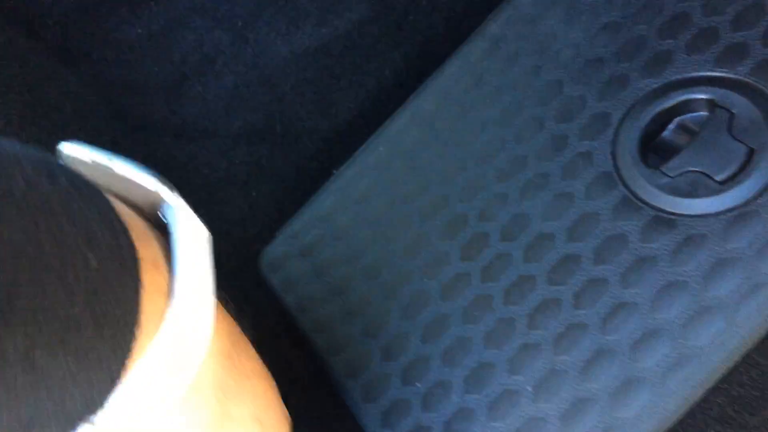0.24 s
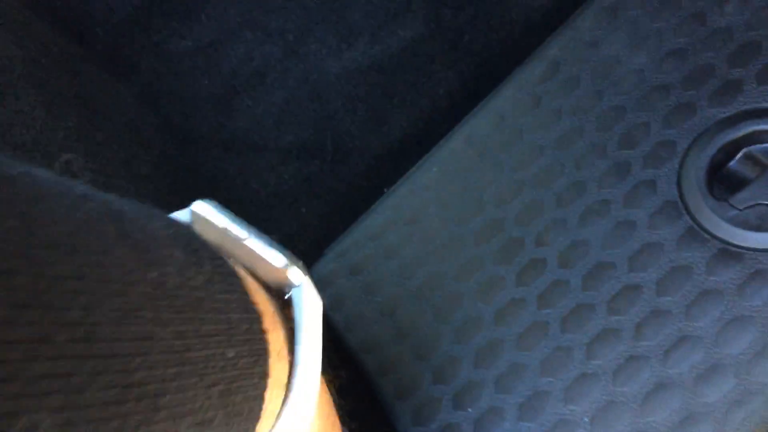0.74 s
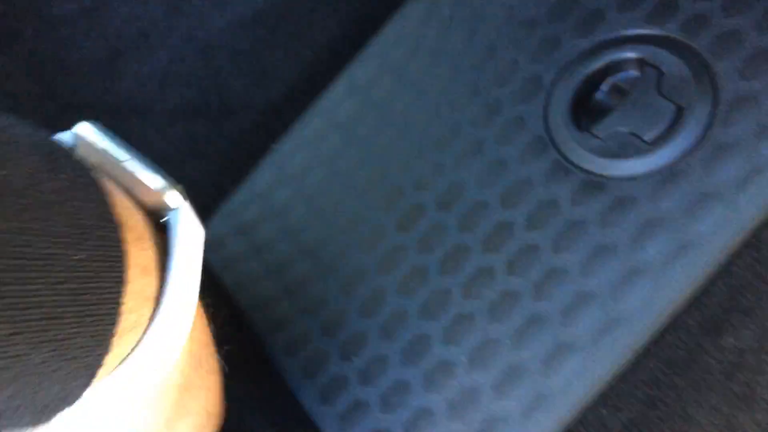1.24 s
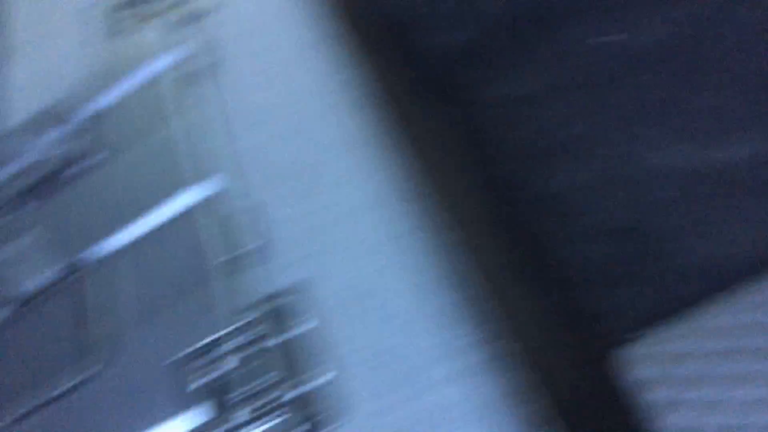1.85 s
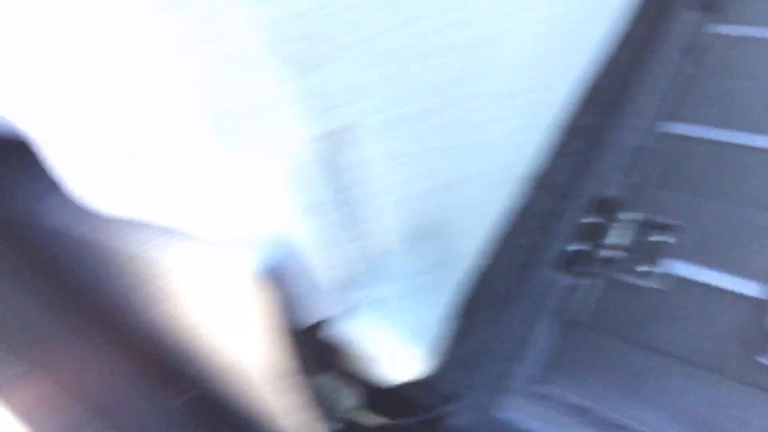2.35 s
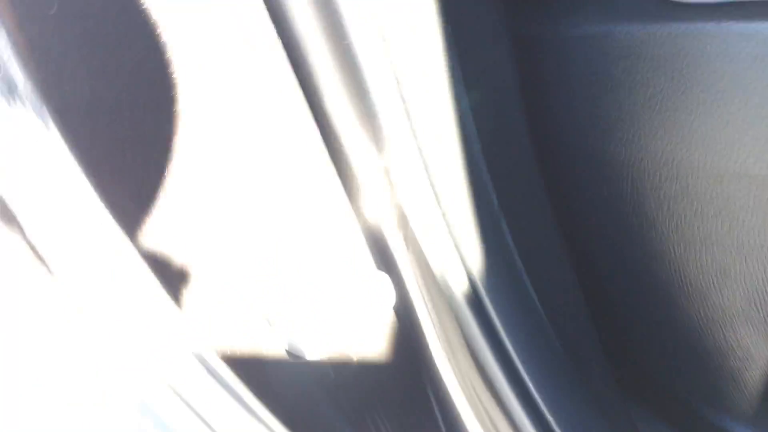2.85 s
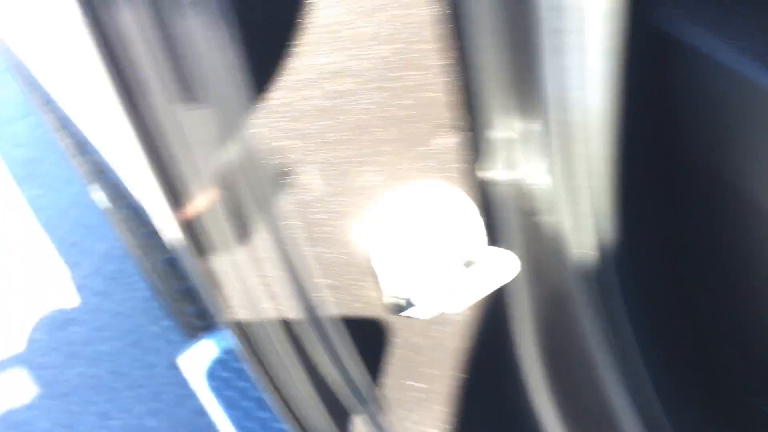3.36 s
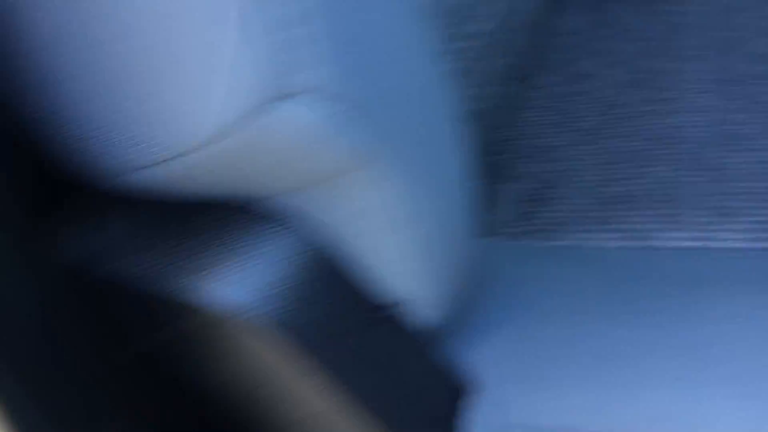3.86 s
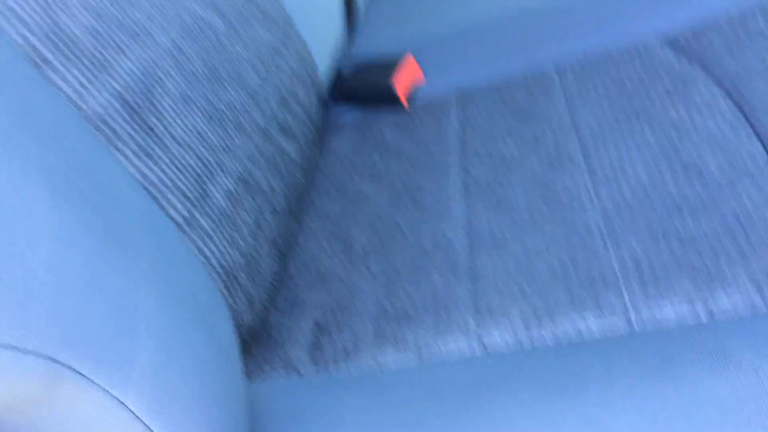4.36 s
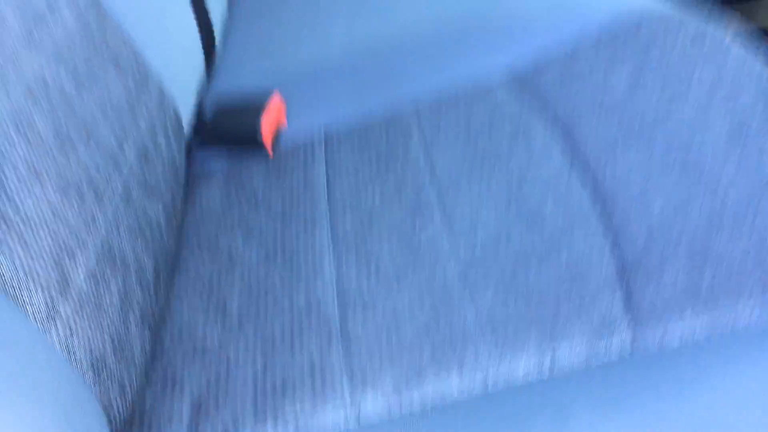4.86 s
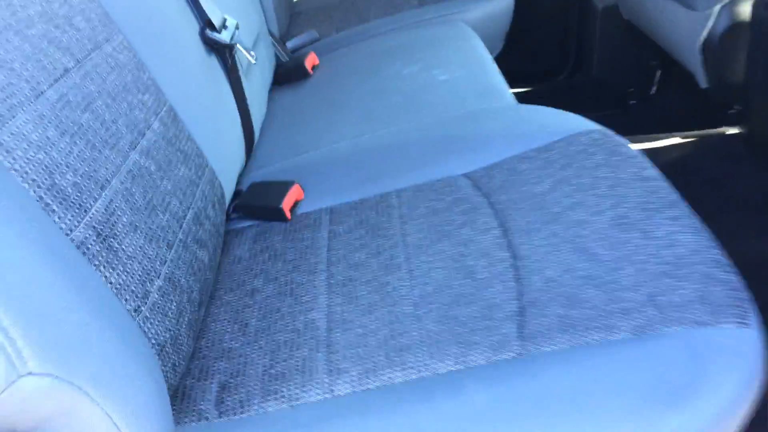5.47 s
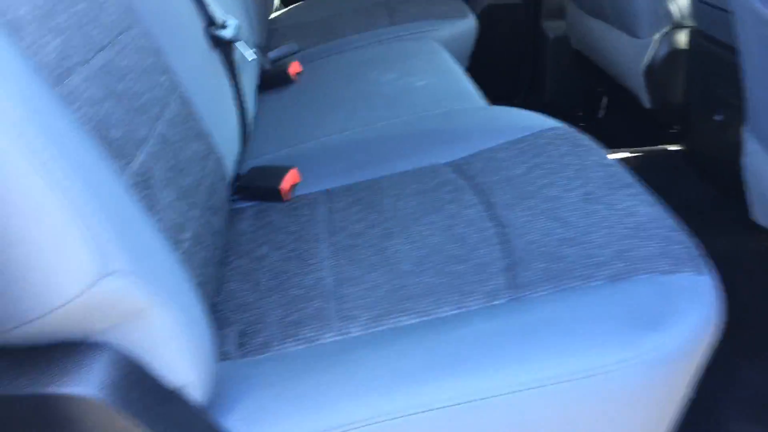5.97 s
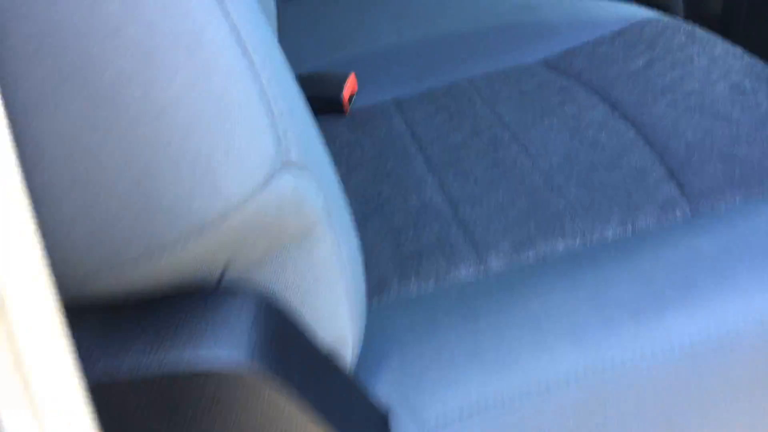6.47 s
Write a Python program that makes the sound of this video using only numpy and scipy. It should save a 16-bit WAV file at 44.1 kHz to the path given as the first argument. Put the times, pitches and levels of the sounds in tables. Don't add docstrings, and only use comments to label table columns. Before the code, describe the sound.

Close to a hand-held phone in a truck cabin with doors open, plastic lids tap and scuff, then one snaps loudly. A small knob clicks. A seat latch cracks and the cushion bangs; an engine pulls away outside through a gear change. Fabric rushes, and a deeper, heavier slam overloads the microphone. Afterwards come soft knocks, scraping and buckle clicks over low road rumble.

```python
import sys
import numpy as np
from scipy import signal
from scipy.fft import rfft, irfft
from scipy.io import wavfile
from scipy.ndimage import uniform_filter1d

SR = 44100
rng = np.random.default_rng(int(sys.argv[2]) if len(sys.argv) > 2 else 0)


def gain_from_db(level_db):
    decades = np.asarray(level_db, float) / 20
    return 10 ** decades


def generate_wav(sig):
    pcm = np.round(np.clip(np.atleast_2d(sig).T, -1, 1) * 32767).astype(np.int16)
    wavfile.write(sys.argv[1], SR, pcm)


N = 296925

# (frequency [Hz], density [dB/Hz])
RUMBLE_SPECTRUM = [(12, -50.5), (20, -24.5), (34, -10), (49, -2.5), (124, 0), (136, -4), (172, -12.5),
                   (247, -5.5), (322, -16), (354, -19.5), (480, -31), (620, -60.5), (1060, -120)]
TYRE_SPECTRUM = [(210, -37.5), (400, -10.5), (510, -14), (620, -6.5), (729, -8), (912, -3.5), (990, -3.5),
                 (1250, -1.5), (2170, -20.5), (2830, -31.5), (3160, -33), (4000, -36.5), (5200, -61),
                 (8800, -120)]
CLOTH_SPECTRUM = [(1500, -23.5), (2240, -7), (2850, -4), (3400, -3.5), (4880, -8.5), (5820, -6),
                  (7450, -11.5), (9500, -12.5), (12000, -16.5), (15700, -17.5), (16500, -45)]
MIC_HISS_SPECTRUM = [(1470, -30.5), (2500, 0.5), (4890, -9.5), (8640, -13.5), (10400, -18), (12000, -13),
                     (15100, -18), (16100, -24), (16500, -41)]

# (time [s], engines [dB], tyres [dB])
TRAFFIC = [(0, -37, -52), (.5, -41, -55), (1.0, -43, -54.5), (1.3, -39, -56), (1.74, -46, -58),
           (2.17, -45, -52.5), (2.47, -37.5, -50.5), (3.1, -36.5, -51.5), (3.42, -34, -47),
           (3.7, -31.5, -47.5), (3.88, -39, -59.5), (4.2, -36.5, -52.5), (4.42, -40, -55.5),
           (5.05, -41, -55), (5.55, -36.5, -49), (5.87, -38.5, -47.5), (6.201, -38, -47.5),
           (6.73, -34.5, -48)]
# (time [s], door shade, dull minus bright [dB], near detour [ms], detour share [ratio])
POSE = [(0, -2.5, 2.8, 0.21), (1.0, 0.5, 3, 0.21), (1.4, 1.5, 2.8, 0.39), (1.9, 0.5, 2.56, 0.18),
        (2.2, -9.5, 2, 0.2), (2.7, -7.5, 1.8, .22), (3.1, -11, 2, 0.57), (3.6, -6.5, 2.06, 0.55),
        (4.0, -10, 1.91, 0.3), (4.8, -9.5, 1.5, .2), (5.3, -4, 2.92, 0.22), (5.9, -6.5, 2.8, 0.27),
        (6.73, -8.5, 1.56, .22)]
# (time [s], level [dB], decay T60 [s], build-up [s])
GUSTS = [
    (2.8, -17.5, .5, .04),
    (3.745, -10.5, 0.34, .03),
]
# (start [s], loudest [s], end [s], level [dB])
BRUSHES = [(-.1, 0, 0.34, -71.5), (.55, 1.0, 1.1, -76.5), (2.063, 2.172, 2.24, -62),
           (2.504, 2.72, 3.2, -89.5), (3.24, 3.46, 3.68, -59.5), (3.502, 3.725, 3.86, -66),
           (3.97, 4.04, 4.17, -70.5), (4.1, 4.24, 4.33, -61), (6.297, 6.728, 7.1, -76)]
CLOTH_REST_DB = -74.5

# (time [s], firing rate [Hz], level [dB])
LOW_GEAR = [(2.15, 140.6, -74), (2.234, 145.1, -47), (2.454, 156.2, -50), (2.572, 168, -36.5),
            (2.678, 176, -43.5), (2.72, 178.9, -65.5)]
HIGH_GEAR = [(2.72, 103, -33.5), (2.882, 112.4, -32), (2.989, 119, -34.5), (3.178, 128.5, -28),
             (3.346, 134.5, -32), (3.398, 128.3, -31.5), (3.606, 104.5, -52), (3.7, 103, -55)]

# (frequency [Hz], peak [dB], decay T60 [s])
SMALL_LID = [(125, -12.5, 0.075), (191, -22, 0.12), (226, -2, 0.028), (8700, -27.5, .027)]
BIG_LID = [(147, -15.5, 0.11), (250, -6, 0.05), (377, -9.5, .055), (566, -15, 0.1), (665, -9.5, 0.035),
           (900, -11, 0.03), (1200, -7, 0.025), (1430, -10.5, 0.03), (1832, -16, .03), (2290, -17, .03),
           (2560, -13, .025), (2920, -21, 0.05), (3300, -19, 0.035), (4000, -20, .02)]
LID_RIM = [(4800, -19, .016), (5300, -23, .014), (7000, -21, .014), (7900, -21, .014), (9900, -22, .014)]
KNOB_OUT = [(1775, -37.5, 0.058), (3040, -25, 0.026), (3950, -34, 0.025), (6300, -41.5, .04)]
KNOB_IN = [(2370, -28, 0.018), (4020, -32, 0.018), (6200, -36, .015)]
CATCH_OPEN = [(1000, -25.5, .04), (1450, -29.5, 0.088), (1700, -27, .025), (2300, -18, .015),
              (2900, -12, .016), (3600, -18, .015), (4450, -13.5, 0.016), (5300, -22, .015),
              (6700, -21, 0.017)]
CATCH_SHUT = [(1446, -33.5, 0.18), (4510, -27.5, 0.019), (9360, -32.5, 0.017), (9820, -36.5, 0.016),
              (11170, -43, .012), (14360, -35, .014), (15100, -39, .012)]
SEAT_BACK = [(119, -10.5, 0.12), (152, -15.5, 0.086), (212, -12.5, 0.07), (270, -3, 0.054), (427, -19, .05),
             (524, -20, 0.077), (680, -14.5, .04), (854, -12.5, 0.049), (1186, -18, .03),
             (1400, -11.5, 0.051), (1680, -19, .04)]
SEAT_BASE = [(128.3, -6.5, 0.15), (160, -7, 0.2), (206, -5, .1), (290, 5.5, 0.05), (415, -2, 0.058),
             (563, -13.5, 0.12), (680, -11, 0.033), (877, -10, 0.04), (1700, -10, 0.025),
             (1950, -14.5, 0.04), (3200, -17, .03), (4360, -19, 0.03)]
BUCKLE = [(320, -31.5, 0.2), (2840, -48, 0.07), (3920, -44, 0.025), (5550, -47, .02)]
FOOTWELL = [(85, -7, 0.028), (145.6, -12, 0.044), (286, -20.5, 0.056)]
# (time [s], part struck, lag of each mode [cycles], contact [s])
BLOWS = [(.223, SMALL_LID, 0.7, .0006), (1.1248, BIG_LID, 0.1, .0001), (1.1248, LID_RIM, .4, .0002),
         (1.6192, KNOB_OUT, 2.17, 0.0022), (1.6514, KNOB_IN, 0.72, .0008),
         (2.8128, CATCH_OPEN, 0.41, 0.00027), (2.859, SEAT_BACK, 2.65, 0.00072),
         (3.7025, CATCH_SHUT, 1.3, 0.00097), (3.733, SEAT_BASE, 1.66, 0.00061),
         (5.595, BUCKLE, 1.05, 0.00079), (6.187, FOOTWELL, 1.04, .0001)]
# (time [s], peak [dB], frequency [Hz], decay T60 [s])
TAPS = [(.152, -21.5, 250, 0.021), (.259, -40, 5770, .023), (0.583, -34, 235, 0.027),
        (1.1246, -5, 760, .012), (1.163, -46, 2950, 0.039), (1.596, -23.5, 292, 0.024),
        (1.6535, -25, 1930, .025), (1.664, -36, 2200, .02), (1.669, -31, 1910, .025),
        (1.673, -35, 2250, .015), (1.637, -43, 6400, .03), (1.627, -36, 3300, .02), (1.601, -26, 280, .015),
        (1.907, -27.5, 404, 0.013), (2.1175, -15, 181, 0.014), (2.159, -15, 646, 0.0077),
        (2.827, -26, 1680, 0.04), (2.897, -32, 4500, 0.027), (2.906, -36, 4400, 0.027),
        (2.881, -19, 5500, 0.015), (2.8618, -5.5, 3680, .022), (2.8615, -13, 2900, .015),
        (2.861, -15, 4700, .014), (2.861, -18, 8050, .012), (2.861, -18, 6700, .012), (2.85, -12, 950, .02),
        (2.85, -19, 2600, .02), (2.882, -24, 8200, .014)]
LATE_TAPS = [(2.85, -11, 1400, 0.049), (2.952, -19, 59, 0.13), (3.846, -45.5, 3970, 0.02),
             (3.848, -23.5, 1490, 0.017), (3.972, -17.5, 61.1, 0.13), (4.322, -20, 116, 0.057),
             (4.653, -34.5, 157.4, .054), (5.158, -19, 375, 0.016), (5.163, -51.5, 2500, 0.049),
             (5.363, -28, 190, 0.058), (5.524, -49, 2920, .03), (5.5245, -22, 79, .1), (.005, -24, 112, .1),
             (.1, -24, 108, .12), (2.887, -3, 84, 0.14), (5.5245, -42, 3350, .05), (5.596, -37, 4000, .025),
             (5.6, -41, 2800, .04), (5.596, -38, 1250, .02), (5.524, -44, 6400, .02),
             (5.548, -48, 6500, .025), (5.576, -46, 5500, .015), (5.6, -30, 480, .04),
             (5.627, -23, 330, .01), (5.625, -28, 173, .085), (5.651, -31, 109, .047),
             (6.381, -16.5, 76.5, 0.074), (3.895, -66.5, 2770, 1.1), (3.9, -74, 2820, .9),
             (3.7587, 6.5, 73.5, .15), (3.746, -5, 80, .07), (3.8, -37, 620, .12), (3.79, -30, 450, .14),
             (3.77, -20, 285, .4), (3.768, -12, 208, .2), (3.76, -28, 786, .1), (3.799, -8.5, 120, .16),
             (3.85, -15, 78, 0.15), (3.752, -18, 900, .025), (2.394, -48.5, 6200, 0.014)]
BUILD_UP_CYCLES, TAP_CONTACT_S = 0.33, 0.00089
BUZZ, LOOSE_S, CLAMPED_BUZZ_RATIO = 0.065, 0.3, 0.4

# (start [s], length [s], level [dB], lowest [Hz], highest [Hz])
SCUFFS = [(0.045, 0.03, -57.5, 2000, 7600), (0.106, 0.17, -55.5, 1510, 5800),
          (0.176, .055, -56, 5000, 15500), (0.227, 0.05, -48, 2500, 15500),
          (0.413, 0.08, -62.5, 2500, 8700), (0.555, 0.077, -57, 2480, 12230),
          (0.919, 0.053, -58.5, 2860, 7550), (1.051, 0.17, -56, 1487, 8000),
          (1.442, 0.051, -51.5, 2980, 7500), (1.575, 0.11, -55, 1500, 13150),
          (2.103, 0.066, -43, 2900, 15500), (2.743, 0.065, -54, 1220, 4500),
          (2.77, 0.044, -46.5, 1504, 12030), (2.827, 0.051, -42.5, 1510, 11800),
          (2.858, .03, -32.5, 2000, 12070), (3.998, 0.072, -69, 3960, 14130), (4.2, 0.13, -65, 1790, 7000),
          (5.517, 0.16, -60, 1800, 7150)]
MORE_SCUFFS = [ (5.518, 0.065, -35, 280, 1200), (5.52, .02, -62, 8000, 15000), (5.59, .02, -62, 8000, 15000),
               (6.58, .14, -67, 9500, 12500), (5.525, .04, -50, 2300, 4000), (5.595, .045, -49, 2300, 4500),
               (1.135, .04, -44, 400, 1000), (1.59, .025, -52, 1800, 4300), (5.1, 0.12, -41, 310, 1200),
               (5.538, 0.16, -29.5, 420, 640), (1.619, 0.063, -53, 1600, 5900), (6.55, .18, -69, 5700, 14000),
               (6.64, 0.074, -62, 11000, 11600), (5.85, 0.45, -63, 2300, 5400), (2.72, .09, -58.5, 11000, 12000),
               (4.703, 0.41, -68, 11000, 11900), (4.19, .1, -61, 9900, 15500)]

# (time [s], treble peak [dB], knock minus treble [dB], decay [s])
LID_CRACKS = [(0.142, -47, 9.5, 0.039), (0.221, -23, -8, 0.025), (0.2233, -18.5, -13, 0.032),
              (0.232, -40, 6, 0.028), (0.2424, -36, -9, 0.016), (.259, -49, -12, .04),
              (.584, -50, 9.5, 0.079), (.6, -53, -3, .03), (1.1248, -4, -11, .012), (1.1265, -14, 0, 0.01),
              (1.1305, -27, -1, 0.03), (1.208, -46, -4, .061), (1.391, -55, 11.5, 0.018),
              (1.6215, -43, 3, 0.03), (1.639, -47, 6, .04), (1.652, -34, -4, 0.039),
              (1.6628, -38.5, -3, 0.018), (1.905, -58, 12.5, 0.018), (2.157, -47.5, 12.5, 0.036),
              (2.394, -47.5, 13.5, .015), (4.764, -57, 8.5, 0.014), (4.84, -60.5, -9, .015),
              (5.157, -57, 11, 0.032)]
SEAT_CRACKS = [(2.7845, -42, 8, 0.032), (2.795, -42, 11, 0.041), (2.8125, -8, -17.5, 0.014),
               (2.8136, -11, -15, .01), (2.821, -27, -8, .025), (2.827, -30.5, 4, .025),
               (2.844, -28, 4, 0.044), (2.8494, -14, 2.5, 0.025), (2.8545, -18, 5, .025),
               (2.861, -6.5, -7, 0.02), (2.8643, -11.5, 0, 0.03), (2.872, -19, 4, .03),
               (2.877, -20.5, 3, .02), (2.8815, -18, -8, 0.018), (2.8845, -19, -5, .012),
               (2.898, -31, 3, .017), (2.907, -39.5, 15, .013), (3.244, -52, -1, .03),
               (3.2856, -50, 3, .03), (3.345, -50, 2, .02), (3.39, -49, 8, .025), (3.688, -47, 4, .02),
               (3.702, -33, -.5, 0.041), (3.7335, -12.5, -1.5, 0.02), (3.7361, -8, -5, .025),
               (3.742, -13, -3, 0.02), (3.7475, -14.5, -4, .02), (3.752, -17, 2, 0.02),
               (3.764, -32, 12, .02), (3.775, -33, 12, 0.028), (3.784, -33.5, 1, .041), (3.8, -44, 3, .03),
               (3.8473, -41.5, 0, .015)]
BUCKLE_CRACKS = [(5.5244, -36.5, 1, .016), (5.5295, -39.5, 5, .02), (5.549, -45, 5, .016),
                 (5.5755, -39.5, 2, .014), (5.5945, -40, 2, .01), (5.5962, -30.5, -1, .018),
                 (5.603, -40, 1, .03), (5.622, -46, 6, .03), (5.651, -48, 4, .02)]
LID_TOP_HZ, LID_DULLING = 17000, 0.08
SEAT_TOP_HZ, SEAT_DULLING = 14000, 0.17
BUCKLE_TOP_HZ = 7200

# (start [s], length [s], level [dB], lowest [Hz], highest [Hz])
GLIDES = [(3.16, .56, -51.5, 2550, 3100), (3.26, .5, -62, 3400, 4300), (3.26, .34, -59.5, 5500, 7000),
          (3.5, .28, -57.5, 5200, 6400), (3.26, .4, -68.5, 8200, 17000), (3.5, .26, -65, 7400, 9000),
          (3.58, .2, -52, 1100, 4600), (3.232, 0.035, -63, 4800, 6000)]

CABIN_T60_S, CABIN_DB = 0.14, -18.5
DUCK_DB, RECOVER_S = -9, 0.23
MIC_TOP_HZ = 15800


def shaped(points):
    hz, db = np.transpose(points)
    log_hz = np.log(np.arange(1, N // 2 + 2) * SR / N)
    gain = gain_from_db(np.interp(log_hz, np.log(hz), db))
    x = irfft(rfft(rng.standard_normal(N)) * gain, N)
    return x / x.std()


def band(x, lo_hz, hi_hz):
    edges_hz = [lo_hz, min(hi_hz, 0.45 * SR)]
    return signal.sosfilt(signal.butter(2, edges_hz, "bandpass", fs=SR, output="sos"), x)


def walk(rate_hz):
    k = int(SR / rate_hz)
    held = np.repeat(rng.standard_normal(N // k + 1), k)
    return uniform_filter1d(uniform_filter1d(held, k), k)[:N]


def fade(t60_s, rise_s):
    t = np.arange(int(t60_s * SR)) / SR
    return t, (1 - np.exp(-t / rise_s)) * gain_from_db(-60 * t / t60_s)


def add(track, start_s, sound):
    i = int(start_s * SR)
    track[i:i + len(sound)] += sound[:N - i]


def bounced(x):
    pose_s, _, detour_ms, share = np.transpose(POSE)
    i = np.arange(N)
    near_ms = np.interp(i / SR, pose_s, detour_ms)
    far_ms = 4.0 + 0.8 * walk(3)
    near = np.interp(i - near_ms * SR / 1e3, i, x)
    far = np.interp(i - far_ms * SR / 1e3, i, x)
    return x + np.interp(i / SR, pose_s, share) * near + 0.3 * far


def rumble():
    time_s, engines_db, _ = np.transpose(TRAFFIC)
    level = gain_from_db(np.interp(np.arange(N) / SR, time_s, engines_db))
    for start_s, db, t60_s, rise_s in GUSTS:
        add(level, start_s, gain_from_db(db) * fade(t60_s, rise_s)[1])
    noise = shaped(RUMBLE_SPECTRUM)
    deep = band(noise, 30, 95)
    lumps = deep * gain_from_db(2.5 * walk(8)) + (noise - deep) * gain_from_db(2.5 * walk(16))
    return 0.92 * lumps * level


def tyres():
    t = np.arange(N) / SR
    time_s, _, tyres_db = np.transpose(TRAFFIC)
    hiss_db = np.interp(t, time_s, tyres_db)
    roar_db = hiss_db + np.interp(t, *np.transpose(POSE)[:2])
    noise = bounced(shaped(TYRE_SPECTRUM))
    roar = band(noise, 520, 1136) * gain_from_db(roar_db + 6.5 + 3.0 * walk(19))
    hiss = band(noise, 893, 7300) * gain_from_db(hiss_db + 3.0 + 0.9 * walk(23))
    return roar + hiss


def rubbing_cloth():
    t = np.arange(N) / SR
    level = gain_from_db(CLOTH_REST_DB)
    for *stroke_s, db in BRUSHES:
        level = level + gain_from_db(db) * np.interp(t, stroke_s, [0, 1, 0])
    grain_db = 1.2 * walk(150)
    weave = np.zeros(N)
    for lo_hz in 1500 * 2 ** (np.arange(7) / 2):
        patch = band(shaped(CLOTH_SPECTRUM), lo_hz, lo_hz * np.sqrt(2))
        weave += patch * gain_from_db(2.2 * walk(30) + grain_db)
    return weave * level


def booms():
    out, buzz = np.zeros(N), np.cumsum(walk(1500)) / SR
    modes = [(*tap, TAP_CONTACT_S) for tap in TAPS + LATE_TAPS]
    for blow_s, part, lag_cycles, contact_s in BLOWS:
        for hz, db, t60_s in part:
            modes.append((blow_s + lag_cycles / hz, db, hz, t60_s, contact_s))
    for start_s, db, hz, t60_s, contact_s in modes:
        t, env = fade(t60_s, contact_s + BUILD_UP_CYCLES / hz)
        i = int(start_s * SR)
        looseness = max(t60_s < LOOSE_S, CLAMPED_BUZZ_RATIO)
        depth_hz = BUZZ * np.clip(hz - 600, 0, 2500) * looseness
        wobble = depth_hz * buzz[i:i + len(t)]
        add(out, start_s, gain_from_db(db) * env * np.sin(2 * np.pi * (hz * t + wobble - wobble[0])))
    return out


def scuffs():
    catches = np.minimum(rng.exponential(size=N // 64 + 1), 3.2)
    catch_db = 3.43 * uniform_filter1d(np.repeat(catches, 64), 48)[:N] - 7.0
    dull_noise = signal.lfilter([1.5], [1, -0.4], rng.standard_normal(N))
    grit = dull_noise * gain_from_db(catch_db) * gain_from_db(2.0 * walk(60))
    out = np.zeros(N)
    for start_s, length_s, db, lo_hz, hi_hz in SCUFFS + MORE_SCUFFS:
        i, n = int(start_s * SR), int(length_s * SR)
        slide = grit[i:i + n] * signal.windows.tukey(min(n, N - i), 0.85)
        add(out, start_s, gain_from_db(db) * band(slide, lo_hz, hi_hz))
    return out


def cracks():
    out, noise = np.zeros(N), rng.standard_normal((2, N))
    rows = [(*row, LID_TOP_HZ * gain_from_db(LID_DULLING * row[1])) for row in LID_CRACKS]
    rows += [(*row, SEAT_TOP_HZ * gain_from_db(SEAT_DULLING * row[1])) for row in SEAT_CRACKS]
    rows += [(*row, BUCKLE_TOP_HZ) for row in BUCKLE_CRACKS]
    for start_s, db, knock_db, decay_s, top_hz in rows:
        t, env = fade(1.48 * np.clip(decay_s, 0.008, 0.2), 0.0001)
        i = int(start_s * SR)
        snap, knock = noise[:, i:i + len(t)]
        snap = band(snap * (0.5 * env ** 1.2 + 0.54 * env ** 4), 1800, top_hz)
        add(out, start_s, gain_from_db(db) * (0.5 * snap + 0.53 * band(snap, 2700, 7500)))
        add(out, start_s, gain_from_db(db + knock_db + 7.0) * band(knock * env, 270, 1900))
    return out


def engine():
    out = np.zeros(N)
    for gear in (LOW_GEAR, HIGH_GEAR):
        time_s, firing_hz, db = np.transpose(gear)
        t = np.arange(time_s[0], time_s[-1], 1 / SR)
        phase = 2 * np.pi * np.cumsum(np.interp(t, time_s, firing_hz)) / SR
        tone = np.sin(phase) + gain_from_db(-24.5) * np.sin(2 * phase)
        level = gain_from_db(np.interp(t, time_s, db)) * signal.windows.tukey(len(t), 0.15)
        add(out, time_s[0], np.sqrt(2) * tone * level)
    return out


def cushion_glide():
    out = np.zeros(N)
    rush = rng.standard_normal(N) * gain_from_db(1.5 * walk(40) + 1.8 * walk(220))
    for start_s, length_s, db, lo_hz, hi_hz in GLIDES:
        i, n = int(start_s * SR), int(length_s * SR)
        swell = rush[i:i + n] * signal.windows.tukey(n, 0.8)
        add(out, start_s, gain_from_db(db + 8.0) * band(swell, lo_hz, hi_hz))
    return out


def cabin_echo(near):
    t, env = fade(CABIN_T60_S, 0.0024)
    echo = band(rng.standard_normal(len(t)), 120, 3000) * env
    return gain_from_db(CABIN_DB) * signal.fftconvolve(near, echo / np.linalg.norm(echo))[:N]


def scene():
    outside = rumble() + tyres() + engine()
    fabric = rubbing_cloth() + cushion_glide()
    near = booms() + scuffs() + cracks()
    return (near + cabin_echo(near) + outside + fabric)[None]


def roll_off(x):
    return signal.sosfilt(signal.butter(12, 16860, fs=SR, output="sos"), x)


def record(dry):
    loud = uniform_filter1d(np.abs(dry[0]), size=2048) > 0.3
    overload = signal.lfilter([1 / SR], [1, 1 / (RECOVER_S * SR) - 1], loud)
    duck_db = DUCK_DB * np.minimum(40 * overload, 1)
    mic = dry + gain_from_db(-76.0 + duck_db) * shaped(MIC_HISS_SPECTRUM)
    mic = signal.sosfilt(signal.butter(2, 40, "highpass", fs=SR, output="sos"), mic)
    mic = signal.sosfilt(signal.ellip(6, 0.3, 30, MIC_TOP_HZ, fs=SR, output="sos"), mic)
    mic = mic - 0.24 * band(mic, 10000, 10900)
    knee = 7
    mix = mic / (1 + np.abs(mic) ** knee) ** (1 / knee)
    return roll_off(mix)


dry = scene()
out = record(dry)
generate_wav(out)
```